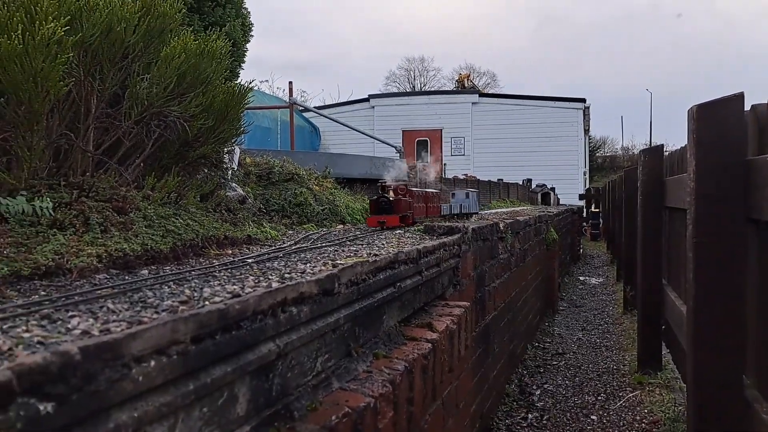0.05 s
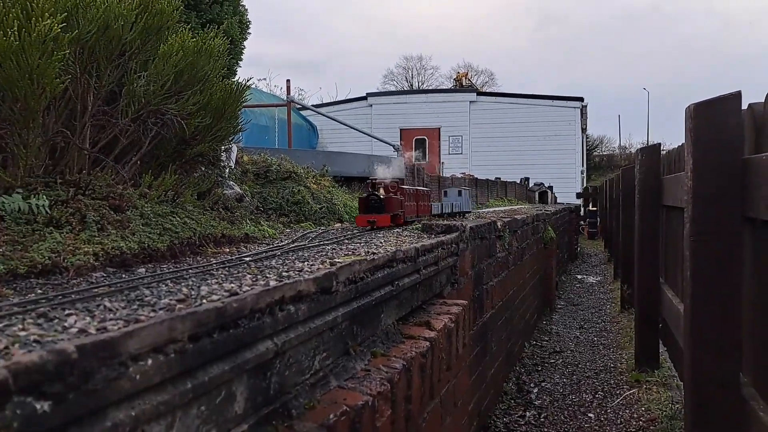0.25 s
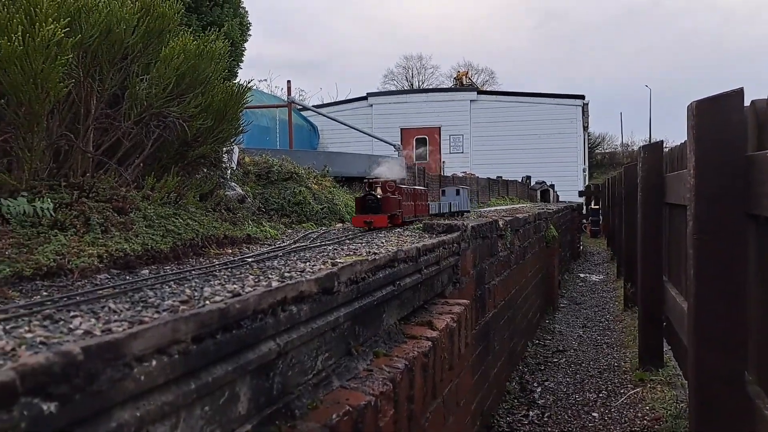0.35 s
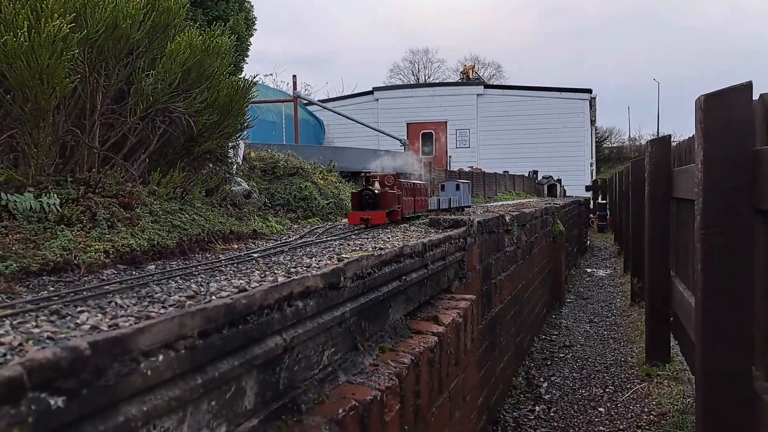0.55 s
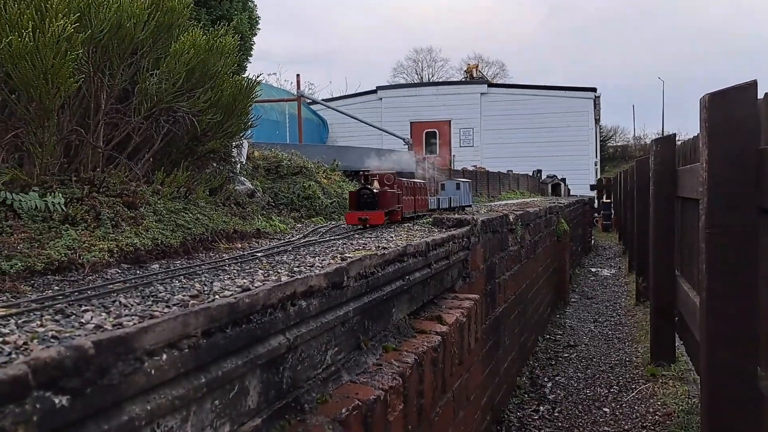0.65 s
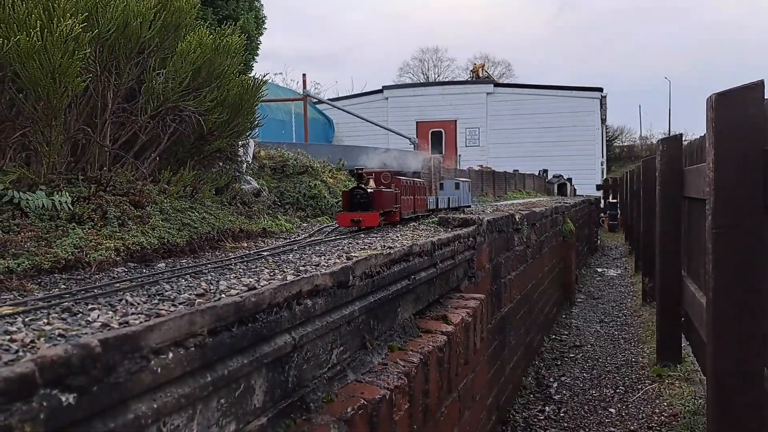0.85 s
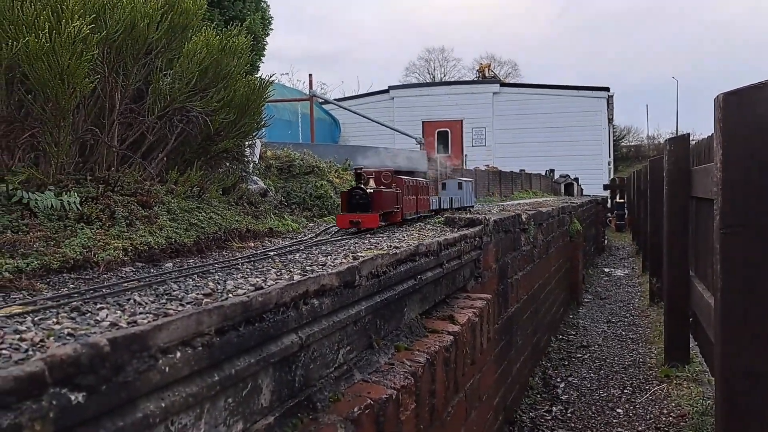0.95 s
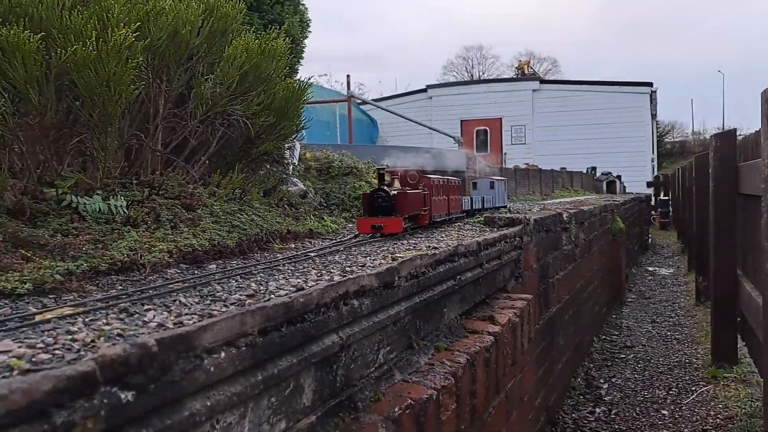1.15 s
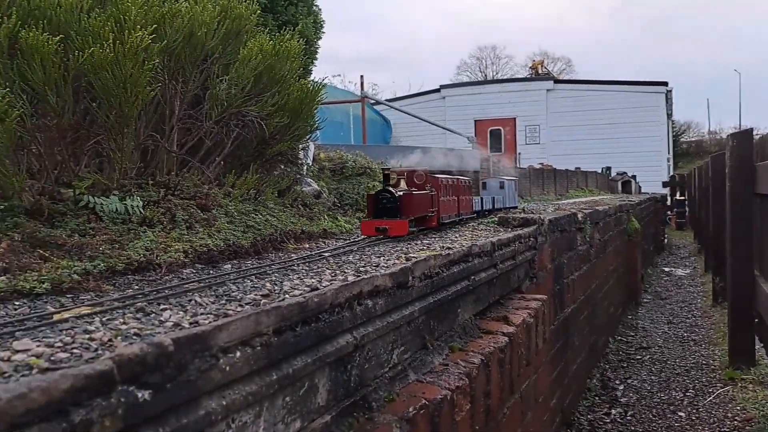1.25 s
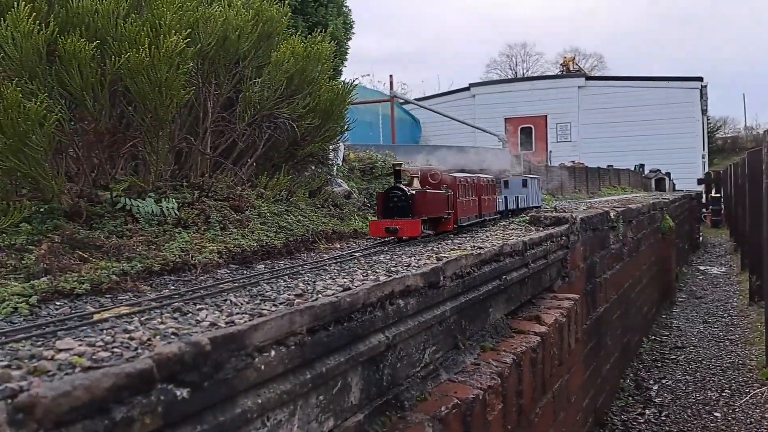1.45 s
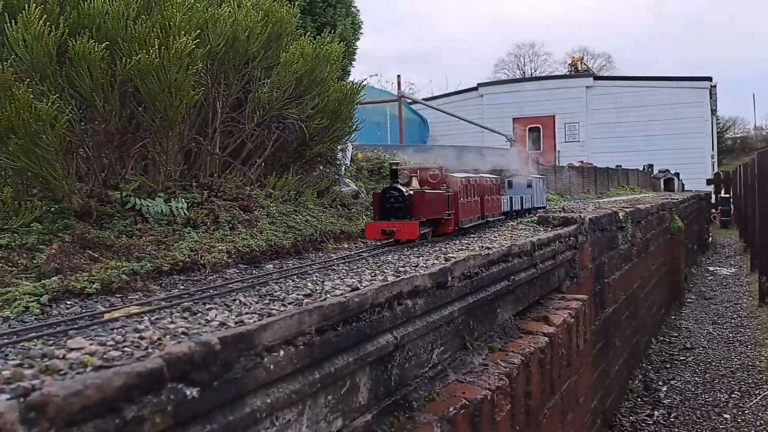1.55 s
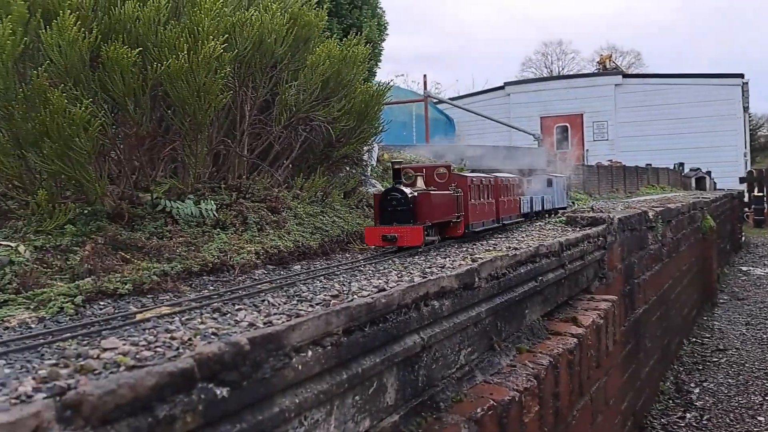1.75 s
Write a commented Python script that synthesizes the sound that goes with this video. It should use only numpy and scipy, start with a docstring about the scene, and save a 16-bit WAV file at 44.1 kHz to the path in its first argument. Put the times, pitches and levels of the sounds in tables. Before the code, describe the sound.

A small model steam train approaches on a garden track, on the right, with a steady hiss, quick light puffs and then faint wheel ticks. Loud wind gusts rumble and thump on the left of the microphone.

```python
"""Live-steam model train in wind.

A small engine approaches on a garden track, almost wholly on the right. Steam hisses in two drifting
bands, the exhaust beats four times a wheel turn and the wheels tick on the rails. Wind buffets the left
microphone port, and the hardest blow drives a limiter. A distant outdoor rush lies behind."""
import sys
import numpy as np
from scipy import signal
from scipy.fft import rfft, irfft
from scipy.io import wavfile
from scipy.ndimage import uniform_filter1d, minimum_filter1d

SR = 44100
rng = np.random.default_rng(int(sys.argv[2]) if len(sys.argv) > 2 else 0)


def int16_out(signal):
    """Quantize to a 16-bit WAV file."""
    q = np.round(np.clip(np.atleast_2d(signal).T, -1, 1) * 32767)
    wavfile.write(sys.argv[1], SR, q.astype(np.int16))


N = 79380

# turbulent rumble, left port: time_s, gain_db
RUMBLE_GAIN = [(0, -23), (.045, -16.5), (.075, -42), (.21, -22), (.235, 1), (.35, -4.5), (.41, 2),
               (.55, -0.5), (.67, -4), (.94, 2), (.99, -10), (1.14, -8.5), (1.19, -0.5), (1.24, -4),
               (1.38, -6.5), (1.45, -0.5), (1.68, -9.5), (1.8, -2)]
# rumble colour: freq_hz, level_db
RUMBLE_SPECTRUM = [(15, -83), (35, -51), (65, -44.5), (130, -54), (190, -61), (280, -71.5), (450, -83),
                   (900, -95), (2500, -120)]
# air flutter, strongest in the hardest gust: time_s, gain_db
FLUTTER_GAIN = [(0, -44), (.44, -10.5), (.5, 3), (.52, 4.5), (.555, -4), (.58, -29), (1.05, -22.5),
                (1.13, -7), (1.24, -25), (1.5, -18), (1.8, -26)]
# flutter colour: freq_hz, level_db
FLUTTER_SPECTRUM = [(100, -18), (350, -58.5), (900, -73), (2400, -85), (3500, -100), (8000, -120)]
# breeze, right port: time_s, gain_db
BREEZE_GAIN = [(0, -1), (.23, -7.5), (.27, -22), (.5, -28), (1.8, -37)]
# breeze colour: freq_hz, level_db
BREEZE_SPECTRUM = [(20, -84), (60, -59.5), (130, -63.5), (250, -75.5), (500, -100)]
# distant rush: time_s, left_db, right_db
RUSH_GAIN = [(.21, -0.5, -5.5), (.31, -1, 2.5), (.46, -3, 3.5), (.56, -2.5, -0.5), (1.2, -5.5, -1.5),
             (1.8, -2, -3.5)]
# rush colour: freq_hz, left_db, right_db
RUSH_SPECTRUM = [(60, -96, -88), (194, -86.5, -94.5), (346, -82.5, -78.5), (536, -79, -81.5),
                 (734, -84.5, -76.5), (1004, -83, -75), (1260, -91, -82.5), (1617, -98.5, -83.5),
                 (2300, -108, -102), (3050, -112, -103), (3740, -104, -104), (4600, -116, -102),
                 (6900, -122, -97), (8900, -114, -102), (10200, -117, -109), (13300, -123, -102),
                 (14400, -126, -106)]
# escaping steam: time_s, gain_db
STEAM_GAIN = [(.23, 3), (.44, 3), (.56, -1), (.85, -2.5), (1.12, 1), (1.34, 0.5), (1.49, 2.5), (1.62, 2),
              (1.8, 2)]
# drifting peaks in the steam hiss: time_s, lower_hz, upper_hz
STEAM_PEAKS = [(.25, 3610, 7700), (.44, 3660, 7520), (.85, 3700, 7250), (1.12, 3850, 6850),
               (1.34, 3970, 6750), (1.49, 3890, 7150), (1.62, 3650, 7240), (1.8, 3620, 7090)]
# broad steam hiss: freq_hz, level_db
HISS_SPECTRUM = [(1200, -100), (2000, -93), (2600, -95), (4000, -96.5), (5500, -99.5), (8000, -101),
                 (10200, -114), (12500, -102), (14500, -102), (16000, -109)]
# eddies striking the left port: start_s, level_db, pitch_hz
EDDIES = [(0.228, -16.5, 135), (0.3823, -10.5, 118), (0.4715, 7.5, 166.3), (0.5106, -12, 157),
          (0.5322, -15.5, 174), (0.5542, -31, 134), (0.621, -12, 120.4), (0.7012, -9.5, 118.4),
          (0.7283, -11, 116), (0.7751, -14.5, 143), (0.801, -10.5, 132), (0.823, -9.5, 129.6),
          (.8500, -10.5, 135), (0.8912, -12, 127), (1.0210, -13.5, 123.4), (1.056, -20.5, 110),
          (1.1510, -18, 99.2), (1.245, -24, 98), (1.3129, -11.5, 150), (1.322, -22, 64), (1.5000, -13, 137),
          (1.617, -21.5, 92), (1.673, -25, 108), (1.737, -22.5, 100)]
# sharp crackles on that port: time_s, level_db, half_width_ms
PORT_CRACKLES = [(.057, -24.5, 0.36), (0.221, -21.5, 0.46), (0.4729, 0.5, 0.37), (.5130, 1, 0.65),
                 (0.5183, -9.5, 0.22), (0.5268, -12, 1.2), (0.5341, -11, 0.34), (.5458, -11, 0.75),
                 (.5570, -14.5, 0.8), (.6225, -14.5, 0.67), (0.7297, -12, 0.98), (1.3158, -10.5, 1),
                 (1.5050, -13, 1.0)]
# exhaust beats in one wheel turn: lag_s, level_db
TURN_BEATS = [(0, 0), (.0405, -3.5), (.081, -2.5), (.128, -7)]
# exhaust puff: freq_hz, level_db
PUFF_SPECTRUM = [(400, -97), (1000, -77), (1600, -100), (2100, -78), (2550, -91.5), (3100, -80.5),
                 (4000, -76.5), (4800, -101.5), (6000, -94.5), (7200, -78.5), (8800, -101.5), (10300, -107),
                 (12500, -90), (15500, -100)]
# wheel-rail contacts: start_s, level_db, tilt_db_per_octave
RAIL_TICKS = [(.668, -8, -7), (.679, -15, -7), (.848, -18, 28), (1.007, -7.5, 3), (1.227, -4.5, -13),
              (1.359, -4, 1), (1.529, -1, 6), (1.550, 0, 9), (1.561, -7, 13), (1.598, -0.5, -16),
              (1.638, 0, -3)]
# wheel and rail modes: freq_hz, level_db, t60_s
WHEEL_MODES = [(2080, -50.5, 0.037), (3630, -47.5, 0.13), (4040, -38.5, 0.019), (4440, -51, 0.021),
               (5570, -48.5, 0.031), (7380, -56, 0.018)]


def undb(db):
    """Decibels to gain."""
    return 10 ** (np.asarray(db) / 20)


def curve(table, axis=1):
    """One table column, interpolated linearly in time."""
    rows = np.array(table, float)
    return np.interp(np.arange(N) / SR, rows[:, 0], rows[:, axis])


def noise(table, axis=1):
    """Noise with a spectrum given in dB per Hz."""
    rows = np.array(table, float)
    hz = np.maximum(np.fft.rfftfreq(N, 1 / SR), 1)
    db = np.interp(np.log(hz), np.log(rows[:, 0]), rows[:, axis])
    return irfft(rfft(rng.standard_normal(N)) * undb(db), N) * np.sqrt(SR / 2)


def walk(rate_hz):
    """Slewed random steps; spread 1."""
    hold = int(SR / rate_hz)
    steps = np.repeat(rng.standard_normal(N // hold + 1), hold)
    slewed = uniform_filter1d(steps, hold)[:N]
    return slewed / slewed.std()


def band(centre_hz, width_hz):
    """Noise in a moving resonance; rms 1."""
    lowpass = signal.butter(2, width_hz / 2, fs=SR, output="sos")
    in_phase, quadrature = signal.sosfilt(lowpass, rng.standard_normal((2, N)))
    phase = 2 * np.pi * np.cumsum(centre_hz) / SR
    shifted = in_phase * np.cos(phase) + quadrature * np.sin(phase)
    return shifted / shifted.std()


def turbulence(flutter_highpass_hz=280):
    """Turbulent air rumbles and flutters on the left port."""
    rumble = noise(RUMBLE_SPECTRUM) * undb(curve(RUMBLE_GAIN) + 2.9 * walk(34.5))
    flutter = noise(FLUTTER_SPECTRUM) * undb(curve(FLUTTER_GAIN) + 2.6 * walk(150))
    highpass = signal.butter(3, flutter_highpass_hz, "high", fs=SR, output="sos")
    return rumble + signal.sosfilt(highpass, flutter)


def breeze():
    """A light breeze on the right port dies away early."""
    return noise(BREEZE_SPECTRUM) * undb(curve(BREEZE_GAIN) + 1.9 * walk(24.8))


def outdoor_rush():
    """A distant rush, independent on each side, wavers slightly."""
    return np.array([noise(RUSH_SPECTRUM, side) * undb(curve(RUSH_GAIN, side) + 2.1 * walk(20.9))
                     for side in (1, 2)])


def steam(jump_s=.226, before_db=-12.5, rise_s=.008, sputter_db=1.3):
    """Steam escapes faintly, then jumps: two drifting bands over a hiss that grows as the engine nears."""
    t = np.arange(N) / SR
    lower_hz, upper_hz = curve(STEAM_PEAKS, axis=1), curve(STEAM_PEAKS, axis=2)
    lower = band(lower_hz, width_hz=800) * undb(-54.5 - 2 * (t + 1))
    # a half-whistling core swells inside the lower band
    core = band(lower_hz, width_hz=380) * undb(-68.5 + 17.5 * (t - 1) + 1.85 * walk(25.06))
    upper = band(upper_hz, width_hz=520) * undb(-61)
    hiss = noise(HISS_SPECTRUM) * undb(3.5 * (t - 1.5))
    onset_db = before_db * (1 - np.clip((t - jump_s) / rise_s, 0, 1))
    return (lower + core + upper + hiss) * undb(curve(STEAM_GAIN) + onset_db + sputter_db * walk(110))


def buffets(bandwidth_octaves=1.107, front_db=-1, front_half_width_s=.0018):
    """Each eddy has a pressure front and thumps the left port; sharp hits crackle."""
    t = np.arange(N) / SR

    def spike(time_s, half_width_s):
        return (1 + ((t - time_s) / half_width_s) ** 2) ** -1.5

    thumps, spikes = np.zeros(N), np.zeros(N)
    for start_s, level_db, pitch_hz in EDDIES:
        edges_hz = pitch_hz * 2 ** (bandwidth_octaves * np.array([-.5, .5]))
        port = signal.butter(3, edges_hz, "band", fs=SR, output="sos")
        ring = signal.sosfilt(port, signal.unit_impulse(N, int(start_s * SR)) + 1e-18)
        thumps += undb(level_db) * ring / np.abs(ring).max()
        spikes += undb(level_db + front_db) * spike(start_s, front_half_width_s)
    for time_s, level_db, half_width_ms in PORT_CRACKLES:
        spikes += undb(level_db) * spike(time_s, half_width_ms / 1000)
    highpass = signal.butter(2, 90, "high", fs=SR, output="sos")
    return -thumps - signal.sosfilt(highpass, spikes)


def exhaust(first_beat_s=.3795, turn_s=.1699, attack_s=.006, decay_s=.007, slope_db_per_s=-0.5):
    """The chimney puffs four unequal beats per wheel turn."""
    t = np.arange(N) / SR
    flow = np.zeros(N)
    for turn_start_s in np.arange(first_beat_s, N / SR, turn_s):
        for lag_s, level_db in TURN_BEATS:
            age_s = t - turn_start_s - lag_s
            puff = np.exp(-np.maximum(-age_s / attack_s, age_s / decay_s))
            flow += undb(level_db + rng.standard_normal()) * puff
    return noise(PUFF_SPECTRUM) * flow * undb(slope_db_per_s * t)


def wheel_ticks(pivot_hz=3730, scrape_db=-41, scrape_decay_s=.0041, scrape_top_hz=7100):
    """Each contact is a short scrape that rings wheel and rail with its own brightness."""
    t = np.arange(N) / SR
    lowpass = signal.butter(2, scrape_top_hz, fs=SR, output="sos")
    ticks = np.zeros(N)
    for start_s, level_db, tilt_db_per_octave in RAIL_TICKS:
        age_s = np.maximum(t - start_s, 0)
        for freq_hz, mode_db, t60_s in WHEEL_MODES:
            detuned_hz = freq_hz * (1 + 0.012 * rng.standard_normal())
            ring = np.sin(2 * np.pi * detuned_hz * age_s) * np.exp(-np.log(1000) * age_s / t60_s)
            tilt_db = tilt_db_per_octave * np.log2(freq_hz / pivot_hz)
            ticks += undb(level_db + mode_db + tilt_db) * ring
        scrape = signal.sosfilt(lowpass, rng.standard_normal(N))
        ticks += undb(level_db + scrape_db) * scrape * np.exp(-age_s / scrape_decay_s) * (t > start_s)
    return ticks


def scene(train_left_db=-42, wind_right_db=-56):
    """Train and breeze right, gusts left, rush on both sides."""
    train = steam() + exhaust() + wheel_ticks()
    wind = turbulence() + buffets()
    left = wind + undb(train_left_db) * train
    right = train + breeze() + undb(wind_right_db) * wind
    return np.array([left, right]) + outdoor_rush()


def record(dry, ceiling_db=0.5, release_db_per_s=130, lookahead_s=.0032, top_hz=15550):
    """A limiter ducks both sides on the hardest buffet; a steep lowpass cuts the top."""
    peak_db = 20 * np.log10(np.abs(dry).max(axis=0) + 1e-9)
    over_db = np.maximum(peak_db - ceiling_db, 0)
    recovery_db = release_db_per_s * np.arange(N) / SR
    gain_db = recovery_db - np.maximum.accumulate(over_db + recovery_db)
    window = int(2 * lookahead_s * SR)
    smooth_db = uniform_filter1d(minimum_filter1d(gain_db, window), window)
    lowpass = signal.ellip(10, .2, 80, top_hz, fs=SR, output="sos")
    return signal.sosfilt(lowpass, dry * undb(smooth_db))


dry = scene()
out = record(dry)
int16_out(out)
```